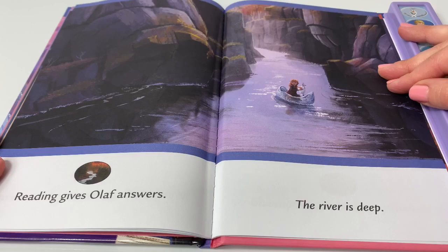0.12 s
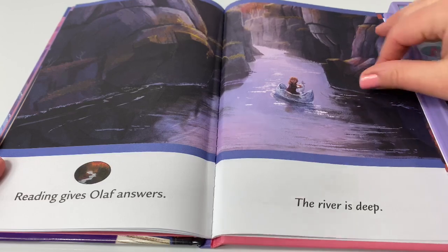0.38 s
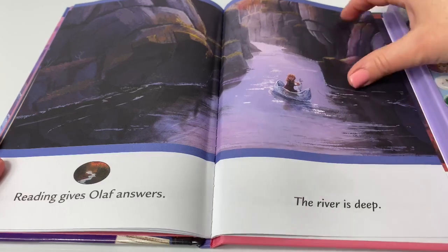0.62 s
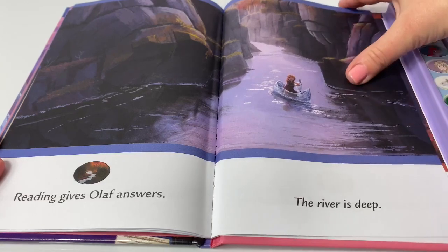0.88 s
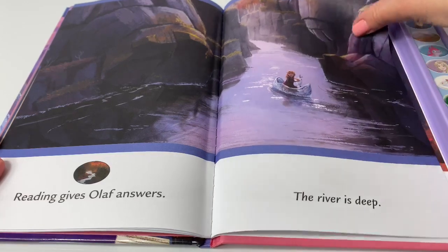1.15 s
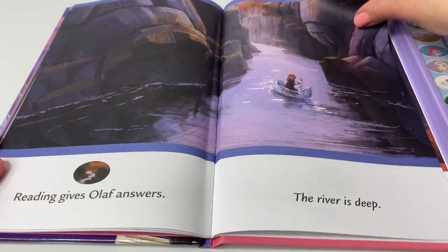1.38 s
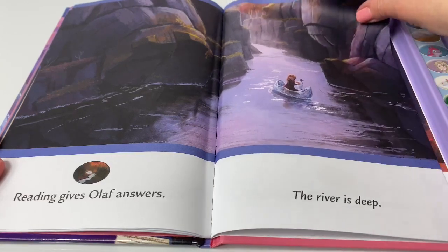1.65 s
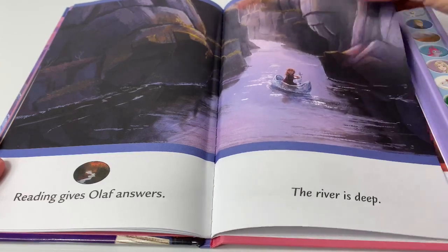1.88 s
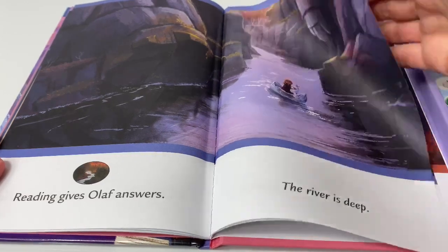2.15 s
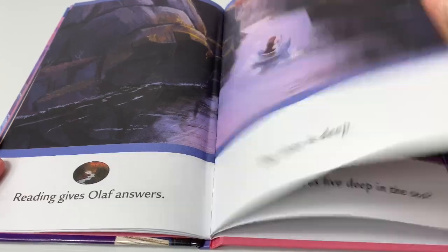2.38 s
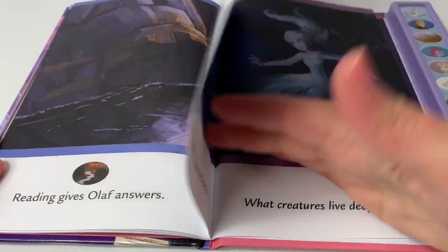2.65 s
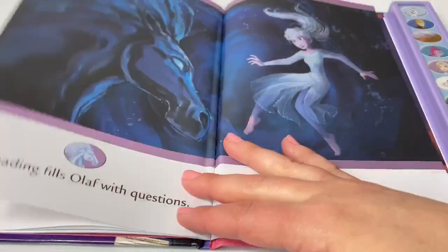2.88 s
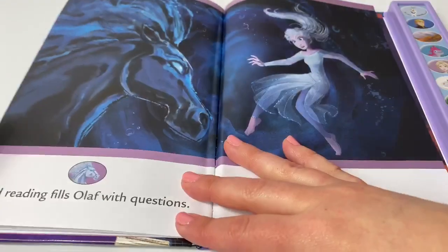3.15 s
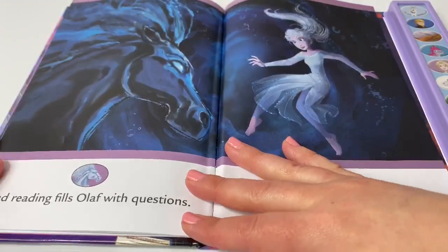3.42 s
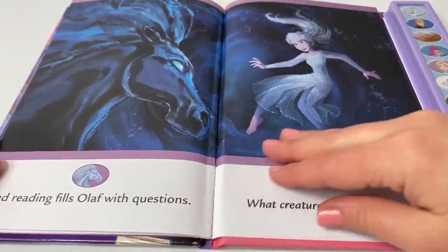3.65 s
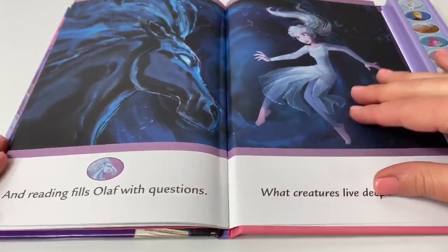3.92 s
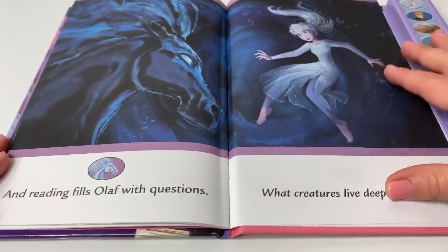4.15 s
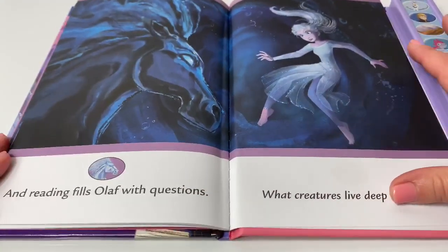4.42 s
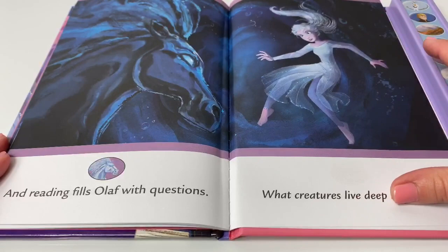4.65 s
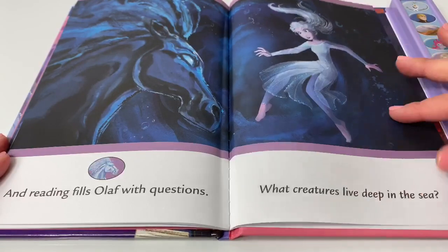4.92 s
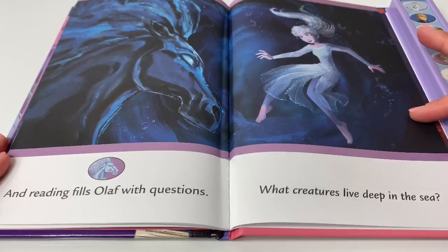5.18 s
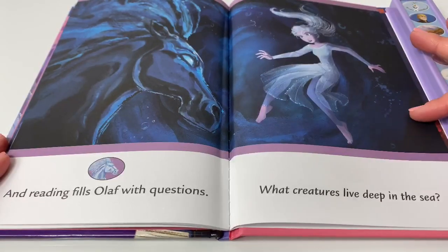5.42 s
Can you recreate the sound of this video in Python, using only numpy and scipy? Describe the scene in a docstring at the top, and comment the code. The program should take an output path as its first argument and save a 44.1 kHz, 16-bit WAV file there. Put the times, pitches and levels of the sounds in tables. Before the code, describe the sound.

Close, dry mono pickup in a small quiet room. Fingertips slide faintly on glossy book pages, then pick at a corner with little pops and one sharper flick. The stiff sheet lifts with two loud snaps and a short hollow wobble, lands softly, and a palm smooths it with gentle thuds and a faint brush. Near the end comes one light tap.

```python
"""Fingers slide over the glossy pages of a stiff book, flick a corner loose, lift the page and lay it over;
the sheet buckles and wobbles as it swings, and a palm smooths it flat, close by in a quiet room.
Sliding skin is shaped noise with tiny slips, and the bending sheet is random clicks ringing in resonators.
Snaps are short decaying pops with rattle and crack; thuds are low decaying tones with a muffled scuff.
The book adds resonances, and sparse decaying reflections and steady noise make the room."""
import sys
import numpy as np
from scipy import signal
from scipy.fft import rfft, irfft
from scipy.io import wavfile

SR = 44100
rng = np.random.default_rng(int(sys.argv[2]) if len(sys.argv) > 2 else 0)


def waveform_to_disk(signal):
    """Save audio, clipped to [-1, 1], as 16-bit WAV at the path in sys.argv[1]."""
    frames = np.transpose(np.atleast_2d(signal))
    scaled = np.clip(frames, -1, 1) * 32767
    samples = np.round(scaled).astype(np.int16)
    wavfile.write(sys.argv[1], SR, samples)


def how_loud(loudness_db):
    """Turn decibels into a plain amplitude multiplier (0 dB gives 1, 20 dB gives 10)."""
    steps = np.asarray(loudness_db, float) / 20
    return 10 ** steps


N = 244567  # samples


def evened(x):
    """Normalisation by mean power: the result has rms 1."""
    return x / np.sqrt(np.mean(x ** 2) + 1e-20)


def read(points, hz):
    """Interpolation on a logarithmic frequency axis."""
    f, value = np.transpose(points)
    return np.interp(np.log(hz + 1), np.log(f + 1), value)


def add(mix, start_s, sound):
    """Superposition: adds a sound to the mix in place, cut off at the end."""
    part = mix[round(start_s * SR):][:len(sound)]
    part += sound[:len(part)]


def coloured(x, points, band=(0, SR)):
    """Minimum-phase filtering to a given spectrum; white noise of rms 1 leaves with rms 1 inside band."""
    hz = np.abs(np.fft.fftfreq(8192, 1 / SR))
    log_gain = np.log(how_loud(np.maximum(read(points, hz), -100)))
    power = np.exp(2 * log_gain) * (hz >= band[0]) * (hz <= band[1])
    # the Hilbert transform of the log gain supplies the phase of a causal filter
    spectrum = np.exp(np.conj(signal.hilbert(log_gain)))
    taps = np.fft.ifft(spectrum).real[:4096]
    return signal.oaconvolve(x, taps / np.sqrt(power.mean()))[:len(x)]


def resonate(x, hz, width_hz):
    """Damped resonance: one complex pole, whose bandwidth sets how fast the ringing dies."""
    r = np.exp(-np.pi * width_hz / SR)
    pole = r * np.exp(2j * np.pi * hz / SR)
    return 2 * signal.lfilter([1 - r], [1, -pole], x).real


def wander(cutoff_hz):
    """Low-passed noise: a random drift of rms 1."""
    return evened(signal.lfilter(*signal.butter(2, cutoff_hz, fs=SR), rng.standard_normal(N)))


def grains(per_s, spread_db):
    """Random impulse train: clicks of either sign at random instants, a few of them large."""
    size_db = spread_db * np.minimum(rng.exponential(1, N), 4)
    size = how_loud(size_db) * rng.choice([-1, 1], N)
    return evened(size * (rng.random(N) < per_s / SR))


def gestures(rows, rise_db_s, fall_db_s):
    """Addition of powers: each movement rises quickly, swells or fades evenly in dB, then lets go."""
    t = np.arange(0, N / SR + .001, .001)
    start, length, db, swell_db = np.transpose(rows)[:, :, None]
    u = t - start
    held_db = db + swell_db * np.clip(u / length, 0, 1)
    rise_db = rise_db_s * np.minimum(u, 0)
    fall_db = fall_db_s * np.maximum(u - length, 0)
    power = how_loud(held_db + rise_db - fall_db) ** 2
    return np.interp(np.arange(N) / SR, t, power.sum(0))


# Spectrum of the room's background noise.
# Each row: frequency in hertz, relative density in dB per hertz.
AIR = [(4.7, -28.5), (8.0, 10.5), (33, -5), (131, -20), (199, -22.5), (454, -38.5), (644, -64.5),
       (1570, -46), (14500, -51.5), (16000, -64)]


def air():
    """Stationary noise: low rumble of the building and a faint steady hiss."""
    level_db = -59.5  # rms
    hz = np.fft.rfftfreq(N, 1 / SR)
    spectrum = rfft(rng.standard_normal(N)) * how_loud(read(AIR, hz))
    return how_loud(level_db) * evened(irfft(spectrum, N))


# Reverberation of the room.
# Each row: frequency in hertz, time to decay by 60 dB in seconds.
ROOM = [(300, 0.22), (2000, 0.21), (12000, 0.17)]


def room(x):
    """Reverberation: sparse reflections of random sign, each band dying at its own speed."""
    taps = np.zeros(SR // 2)
    at = np.arange(120, len(taps) - 20, 20)  # one reflection in every 20 samples
    taps[at + rng.integers(0, 20, len(at))] = rng.choice([-1., 1.], len(at))
    hz, t, bands = signal.stft(taps, SR, nperseg=256)
    decay = how_loud(-60 * t / read(ROOM, hz)[:, None])
    tail = signal.istft(bands * decay, SR, nperseg=256)[1]
    return signal.oaconvolve(x, tail / np.linalg.norm(tail))[:N]


# Soft blows that reach the table through the book.
# Each row: start in seconds, relative level in dB, pitch in hertz.
THUDS = [(.435, -62, 70), (2.13, -54, 110), (2.36, -54, 100), (2.56, -56, 120), (3.149, -57.5, 282),
         (3.203, -51.5, 61.7), (3.374, -49.5, 72), (3.541, -51, 61), (3.799, -56.5, 182), (4.593, -56, 117),
         (4.828, -44, 108)]


def thuds():
    """Damped low-frequency vibration: book and table answer a soft push with a low tone and a muffled scuff."""
    t = np.arange(round(.15 * SR)) / SR
    out = np.zeros(N)
    envelope = (1 - np.exp(-t / 0.012)) * how_loud(-60 * t / .12)
    scuffs = signal.lfilter(*signal.butter(2, 350, fs=SR), rng.standard_normal((len(THUDS), len(t))))
    for (start_s, db, hz), scuff in zip(THUDS, scuffs):
        swing = np.sin(2 * np.pi * hz * t) + 0.72 * evened(scuff)
        add(out, start_s, how_loud(db) * 1.6 * envelope * swing)
    return out


# Resonances of the covers and the page stack.
# Each row: frequency in hertz, width in hertz, boost in dB.
BOOK = [(573.6, 37, 5.5), (1750, 59, 2.5), (3670, 250, 2)]


def book(x):
    """Sympathetic resonance: covers and page stack ring briefly along with sliding skin and bending sheet."""
    return x + sum((how_loud(db) - 1) * resonate(x, hz, width_hz) for hz, width_hz, db in BOOK)


# How the contact changes.
# Each row: time in seconds, tension of the sheet from 0 to 1,
# share of flat palm or page against fingertip from 0 to 1.
CONTACT = [(0, 0.23, 0.45), (1.1, 0.78, 0), (1.9, 0.51, 0), (2.37, 0.87, 0.03), (2.52, .5, .5),
           (2.72, 0.41, 0.9), (3.45, 0.41, 1), (4.85, 0.6, 0)]


def contact(column):
    """Slowly varying boundary condition: tension (column 1) or flatness (column 2) over time."""
    rows = np.array(CONTACT)
    return np.clip(np.interp(np.arange(N) / SR, rows[:, 0], rows[:, column]), 0, 1)


# Fingers or palm dragging over a page.
# Each row: start in seconds, length in seconds, skin sliding level in dB, sheet bending level in dB,
# swell over the stroke in dB; the levels hold at the start of the stroke.
STROKES = [(.31, .08, -74, -65, -5), (.42, .015, -68, -60, 2), (.52, .05, -75, -64, -10),
           (.655, .08, -72, -73, -8), (.825, .015, -82, -76, -1), (.945, .095, -72, -74, 10),
           (1.05, .125, -60.5, -75, -2), (1.22, .27, -81, -76, -1), (1.55, .09, -69, -64, -4),
           (1.65, .13, -72, -78, 8), (1.79, .14, -73, -73, -9), (1.95, .105, -73, -75, 13),
           (2.1, .04, -64, -64, 6), (2.145, .085, -60, -54, -4), (2.25, .09, -67, -66, 11),
           (2.448, .22, -69, -70, 2), (2.7, .06, -77, -68, -1), (2.878, .24, -75, -80, -7),
           (3.39, .12, -75, -75, 10), (3.52, .53, -67, -68, -10), (4.67, .14, -78, -84, 7),
           (4.82, .015, -65, -70, 3), (4.918, .035, -68, -63, -5), (4.97, .58, -80, -75, -9)]


def strokes(level_column):
    """Friction drive: power of the strokes as skin sliding (column 2) or sheet bending (column 3)."""
    rows = np.array(STROKES)[:, [0, 1, level_column, 4]]
    return gestures(rows, rise_db_s=450, fall_db_s=550)


# Spectrum of skin on coated paper.
# Each row: frequency in hertz, relative density in dB per hertz.
GLOSS = [(300, -36), (1200, -1.5), (3500, 1), (4500, -4), (6500, -0.5), (9500, -8.5), (14500, -10.5),
         (15800, -14), (16200, -40)]


def sliding():
    """Stick-slip friction: skin hisses in tiny slips; a flat light contact hisses higher than a fingertip."""
    resting_db = -89  # hands never lie quite still
    slips = evened(rng.standard_normal(N) + 0.59 * grains(per_s=660, spread_db=3))
    slips = slips * how_loud(1.0 * wander(30))
    hiss = coloured(slips, GLOSS, (4500, 15000))
    top = resonate(hiss, 13500, 5000)
    strength = np.sqrt(strokes(level_column=2) + how_loud(resting_db) ** 2)
    return strength * (hiss + 0.54 * contact(column=2) * top)


# The sheet flexing on its own as it is lifted, swings and settles.
# Each row: start in seconds, length in seconds, level at the start in dB, swell over the length in dB.
FLEXES = [(.17, .11, -86, 6), (.435, .04, -58, -8), (.8, .13, -78, 0), (1.12, .06, -70, 8),
          (1.65, .21, -65, 0), (1.995, .07, -54, -9), (2.358, .025, -33, -10), (2.395, .105, -45.5, 1),
          (2.51, .06, -49, -6), (2.58, .09, -53, -7), (2.872, .09, -59, -16), (3.045, .08, -66, -16),
          (3.205, .13, -67, -16), (3.39, .05, -60, -12), (4.06, .13, -76, -9), (4.83, .055, -49, -17)]


def flexes():
    """Free bending: power of the sheet's own movements, which set in abruptly."""
    return gestures(FLEXES, rise_db_s=2500, fall_db_s=400)


# What the taut bending sheet radiates.
# Each row: frequency in hertz, relative density in dB per hertz.
SHEET = [(100, -23), (450, -13.5), (750, 4.5), (1400, -1), (2500, -7), (4000, -29), (7000, -65.5)]


def taut_sheet(x, band=(0, SR)):
    """Radiation from a plate: the taut sheet shapes the spectrum of whatever bends it."""
    return coloured(x, SHEET, band)


# The same sheet barely stressed, which is duller.
# Each row: frequency in hertz, relative density in dB per hertz.
SLACK = [(60, -10.5), (250, 0), (650, 6.5), (1400, -8.5), (2600, -25.5), (7000, -32)]


def bending():
    """Buckling: the stiff sheet gives in clumps; each buckle rings a few cycles at the pitch of its patch."""
    resting_db = -86  # hands never lie quite still
    band = (450, 2800)  # Hz
    patches_hz = np.geomspace(200, 5000, num=14)
    buckles = sum(resonate(grains(per_s=580, spread_db=1.0), hz, 0.19 * hz) for hz in patches_hz)
    buckles = evened(buckles * how_loud(2.3 * wander(35)))
    taut = contact(column=1)
    sound = taut * taut_sheet(buckles, band) + (1 - taut) * coloured(buckles, SLACK, band)
    strength = np.sqrt(strokes(level_column=3) + flexes() + how_loud(resting_db) ** 2)
    return strength * sound


# Spectrum of the sheet's edge letting go.
# Each row: frequency in hertz, relative density in dB per hertz.
CRACK = [(1300, -30), (2500, -1), (3100, -4), (3700, 0), (4800, -6.5), (8000, -7.5), (14500, -16.5)]
# Pops, flicks and taps.
# Each row: start in seconds, relative level in dB, pop pitch in hertz, share of rattle from 0 to 1,
# relative crack level in dB.
SNAPS = [(.507, -53, 705, 0.5, -81.5), (1.326, -33.5, 790, 0.15, -67.5), (1.381, -49, 785, 0.35, -83.5),
         (1.401, -52, 760, .3, -86), (1.422, -40, 775, 0.3, -71.5), (1.463, -40, 694, 0.15, -72.5),
         (1.519, -22, 805, 0.46, -52), (1.598, -44, 780, 0.5, -75), (1.624, -42, 670, 0.5, -78),
         (1.668, -48, 600, .4, -82), (1.828, -34, 930, 0.4, -73), (1.933, -58, 1500, .5, -81),
         (1.992, -33, 1040, 0.05, -72), (2.01, -42, 880, .3, -85), (2.096, -36, 573, 0.5, -71),
         (2.136, -15.5, 2190, .6, -67), (2.357, -16.5, 1100, 0.6, -73), (2.433, -55, 1200, .3, -72),
         (2.792, -54, 1210, .9, -81.5), (2.931, -50, 560, .9, -74), (3.005, -46, 1750, 0.2, -75),
         (3.199, -45.5, 604, 0.51, -79), (3.366, -45, 680, .5, -80), (3.373, -65, 700, .3, -76),
         (3.392, -47, 880, 0.9, -77), (3.545, -43, 710, 0.42, -87), (3.663, -43, 2370, 0.47, -69.5),
         (4.214, -68.5, 1690, 0.05, -86.5), (4.578, -72, 1500, .3, -88), (4.593, -57.5, 700, 0.45, -88.5),
         (4.838, -30, 1340, 0.2, -86), (5.443, -75, 1500, 0.26, -83)]


def snaps():
    """Snap-through instability: a dent pops in about two cycles, rattles, and its edge cracks a moment later."""
    rattle_t60_s, crack_t60_s, crack_delay_s = .033, .035, .001
    t = np.arange(round(.2 * SR)) / SR
    rattle_envelope = how_loud(-60 * t / rattle_t60_s) * (1 - np.exp(-t / 0.0029))
    crack_envelope = how_loud(-60 * t / crack_t60_s) * (1 - np.exp(-t / 0.00028))
    pops, rattles, cracks = np.zeros((3, N))
    noise = rng.standard_normal((len(SNAPS), 2, len(t)))
    for (start_s, db, hz, share, crack_db), (rattle, crack) in zip(SNAPS, noise):
        share = np.clip(share, 0, 1)
        cycles = hz * t
        pop = 2.5 * cycles * np.exp(-.8 * cycles ** 2) * np.sin(2 * np.pi * cycles)
        add(pops, start_s, how_loud(db) * (1 - share) * pop)
        add(rattles, start_s, how_loud(db) * share * rattle * rattle_envelope)
        add(cracks, start_s + crack_delay_s, how_loud(crack_db) * 5.06 * crack * crack_envelope)
    # a small dent moves little air in the bass
    pops = signal.lfilter(*signal.butter(2, 300, "high", fs=SR), pops)
    # a sudden jolt excites the small high patches most
    rattles = signal.lfilter([1.9, -1.65], 1, rattles)
    return pops + 2.53 * taut_sheet(rattles) + coloured(cracks, CRACK, (4500, 15000))


def scene():
    """Superposition of direct sound, reverberation and background noise."""
    close = book(bending() + sliding()) + snaps() + thuds()
    return (close + how_loud(-13.5) * room(close) + air())[None]


def band_limit(x):
    """A steep low-pass at the top of the band."""
    return signal.sosfilt(signal.butter(12, 16500, fs=SR, output="sos"), x)


def record(dry):
    """Single-channel pickup: the finished mix is passed on at its own level."""
    return band_limit(dry)


dry = scene()
out = record(dry)
waveform_to_disk(out)
```